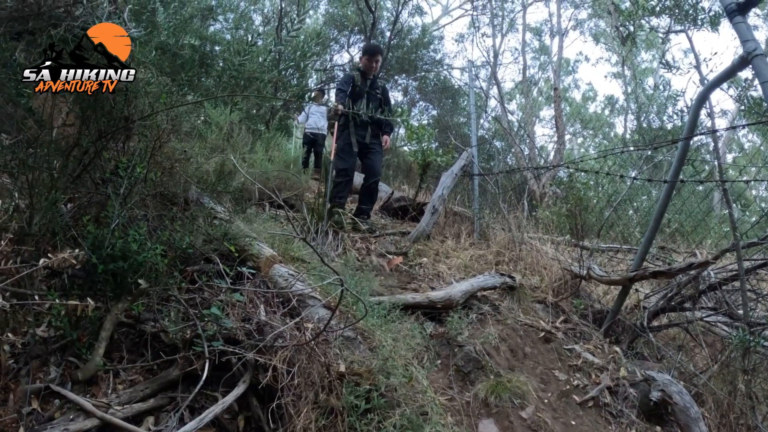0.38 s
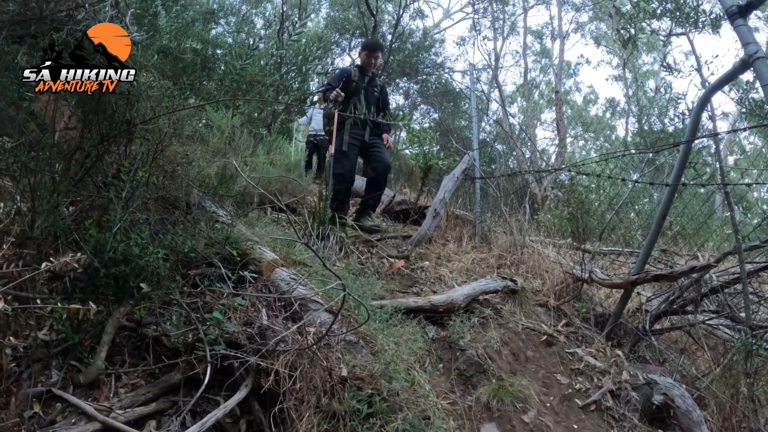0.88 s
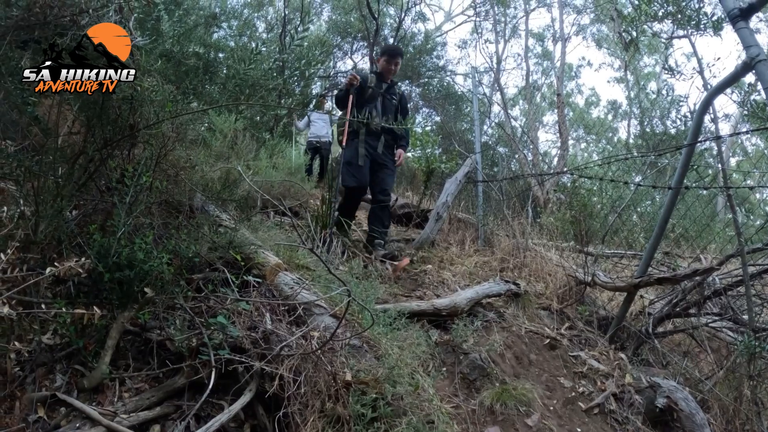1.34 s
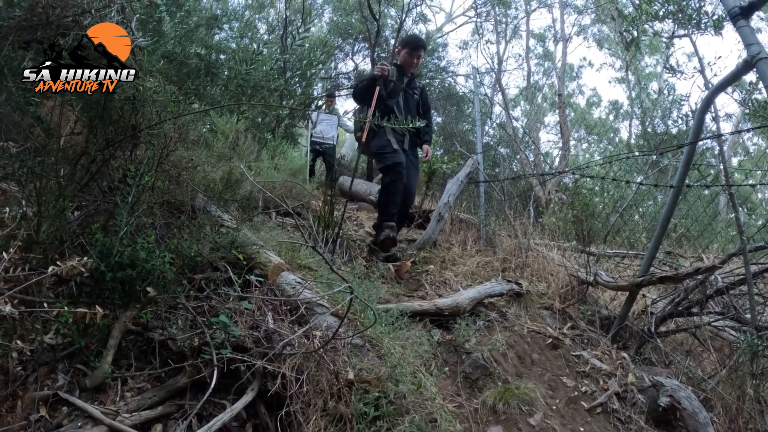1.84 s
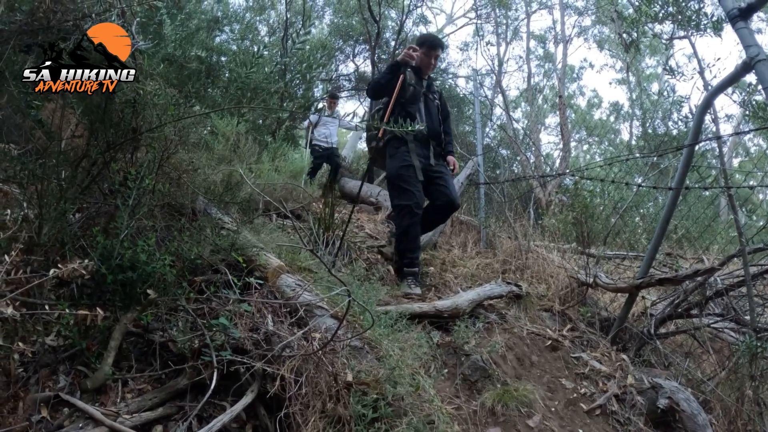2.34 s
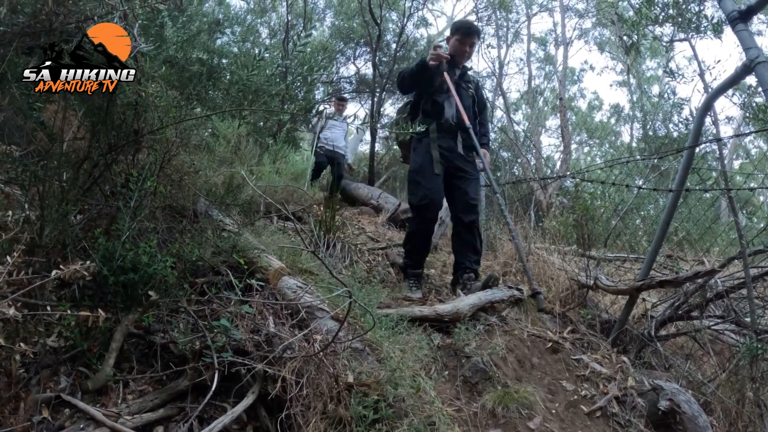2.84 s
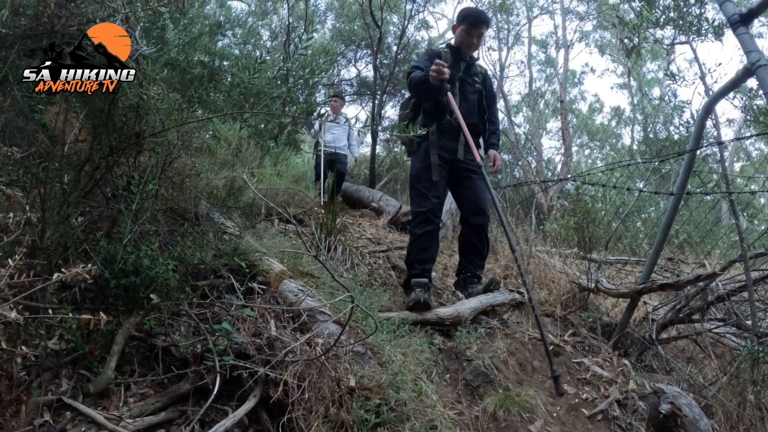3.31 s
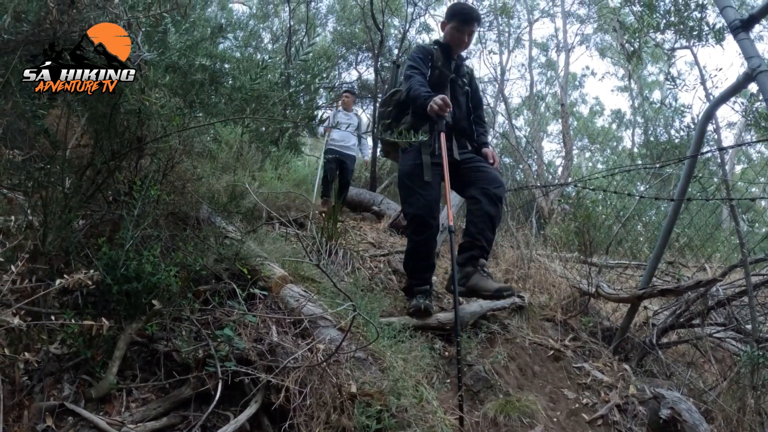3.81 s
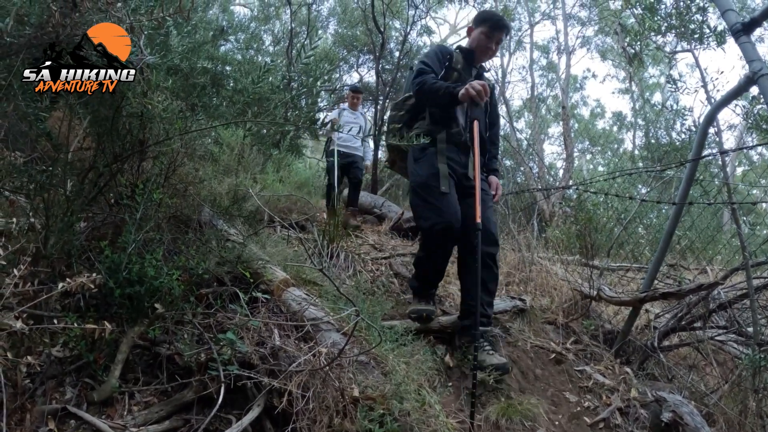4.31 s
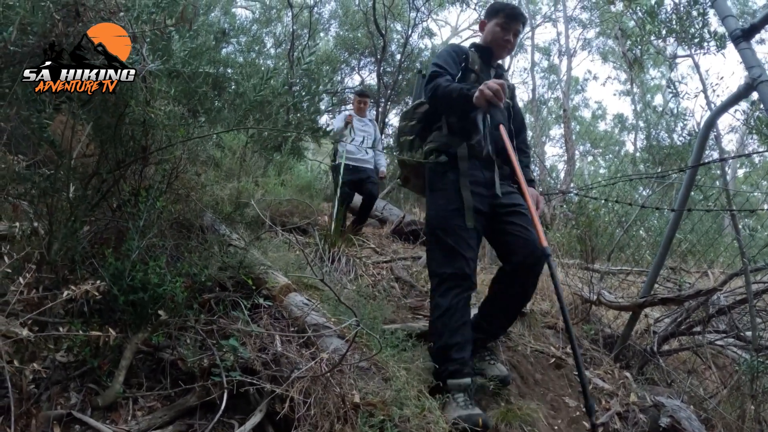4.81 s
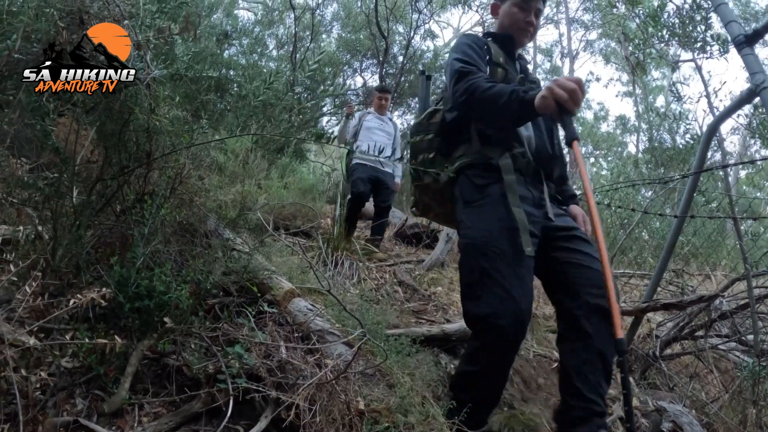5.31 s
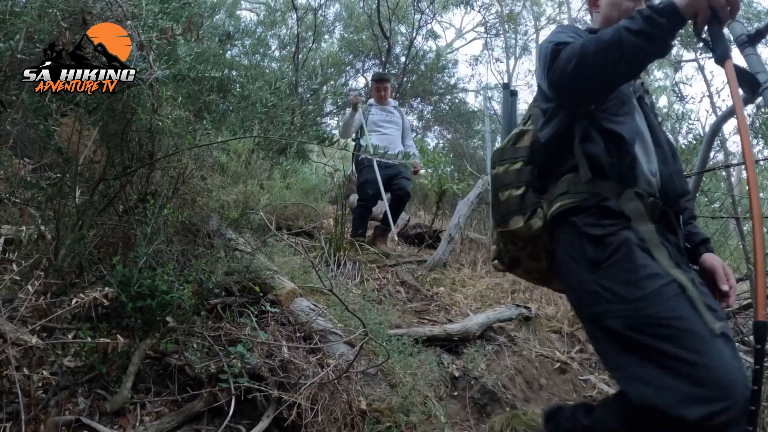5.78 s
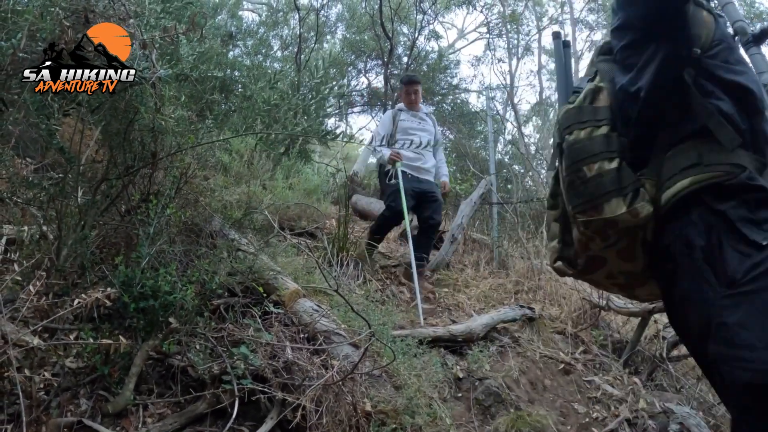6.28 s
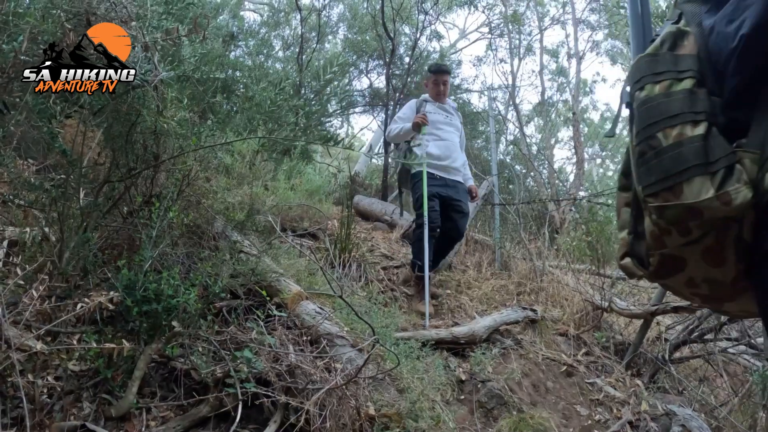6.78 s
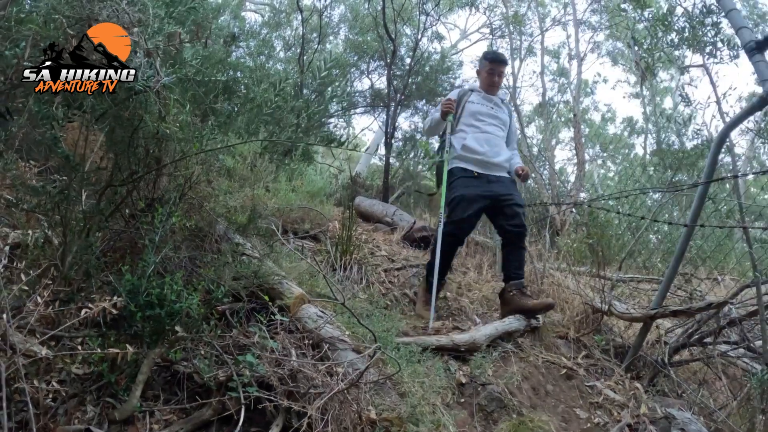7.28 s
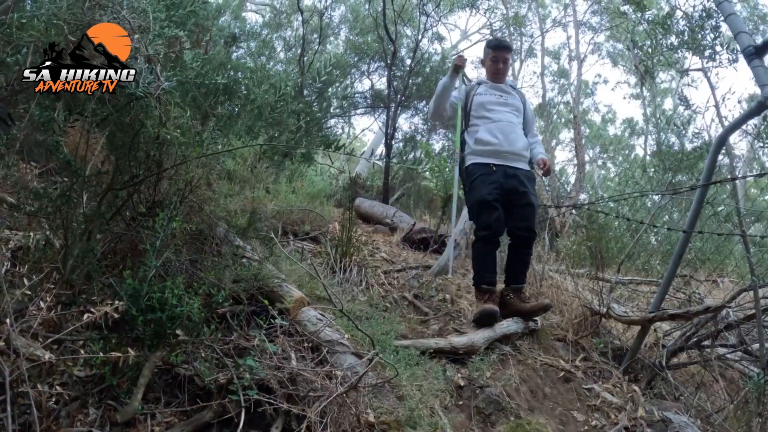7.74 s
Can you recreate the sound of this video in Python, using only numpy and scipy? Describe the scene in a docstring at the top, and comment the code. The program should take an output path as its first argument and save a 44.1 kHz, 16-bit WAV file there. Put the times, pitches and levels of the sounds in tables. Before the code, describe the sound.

Two hikers descend through brittle litter: soft leaf crackle, sharp pole knocks, then close heavy twig breaks, thuds and crumbling soil.

```python
"""Boots of two walkers coming down a dry bush slope: leaf crackle is noise plus ringing grains, soil slides.
Twigs snap as short damped cycles with splinter noise; heels thud as low swings of sagging pitch.
A metal trekking pole rings as a sum of decaying modes when it knocks logs and stones.
The slope scatters the sharp sounds; behind lie bird peeps in sines, and breeze rumble and air in shaped noise.
Two close microphone ports hear it all, each with a slightly different colour and timing."""
import sys
import numpy as np
from scipy import signal
from scipy.fft import rfft, irfft, next_fast_len
from scipy.io import wavfile
from scipy.ndimage import uniform_filter1d

SR = 44100
rng = np.random.default_rng(int(sys.argv[2]) if len(sys.argv) > 2 else 0)


def to_linear_factor(level_db):
    """Convert decibel levels (scalar or array-like) to linear amplitude factors."""
    exponent = np.asarray(level_db, float) / 20
    return 10 ** exponent


def int16_out(signal):
    """Quantize to a 16-bit WAV file."""
    q = np.round(np.clip(np.atleast_2d(signal).T, -1, 1) * 32767)
    wavfile.write(sys.argv[1], SR, q.astype(np.int16))


N = 347508  # length in samples

# boots pressing into the litter: t/s of full weight, leaf level/dB, soil level/dB,
# time/s to build the last 10 dB, time/s to settle by 10 dB (times below 0.005 s act as 0.005 s)
FOOTFALLS = [(.04, -54.5, -64, .03, 0.05), (.175, -60.5, -68, -0.5, -0.1), (.27, -51, -58.5, .02, 0.13),
             (.47, -46, -50.5, 0.05, 0.0835), (.65, -54, -72, .15, 0.3), (1.04, -54, -62, 0.03, 0.2),
             (1.16, -58.5, -65.5, 0, .15), (1.335, -47, -48, .02, 0.12), (1.498, -49.5, -58.5, 0.08, .09),
             (1.851, -53, -61, -0.06, 0.06), (1.995, -46, -70, .02, 0.27), (2.225, -51, -52.5, 0.04, 0.14),
             (2.39, -50, -55, -0.1, -0.13), (2.545, -46, -80, 0.13, 0.16), (2.783, -43.5, -51, 0.03, 0.09),
             (2.96, -56, -64, 0.07, 0.36), (3.188, -49.5, -54, 0.04, 0.22), (3.31, -54.5, -63, 0.03, 0.19),
             (3.515, -37.5, -66, .01, .065), (3.708, -52.5, -60.5, -0.16, 0.13),
             (4.247, -52, -54, 0.07, 0.04), (4.44, -57.5, -61.5, 0.4, 0.6), (4.54, -51, -54.5, .05, 0.2),
             (4.875, -40.5, -39, 0.0336, 0.17), (5.058, -42, -51.5, 0.0056, 0.07),
             (5.22, -50.5, -52, 0.05, 0.5), (5.501, -48, -45.5, 0.04, 0.07),
             (5.678, -38, -37, 0.0634, 0.03), (5.769, -48, -47.5, 0.11, 0.05),
             (5.98, -45.5, -48.5, .06, 0.08), (6.231, -37, -39.5, 0.0623, 0.11),
             (6.37, -45, -44, 0.04, 0.1), (6.61, -34, -31, 0.0229, 0.07), (6.68, -40.5, -41, .04, 0.05),
             (6.75, -44, -42, 0.17, .025), (6.91, -42, -45, 0.07, 0.04), (6.988, -40, -37, 0.05, 0.05),
             (7.064, -41, -34.5, -0.04, 0.03), (7.132, -42.5, -34.5, -0.01, 0.1),
             (7.24, -45, -42, 0.07, 0.11), (7.321, -39.5, -36.5, 0.04, 0.0453),
             (7.36, -43, -42, 0.09, 0.08), (7.65, -46, -47, 0.22, 0.43)]


def tread(column, rest_db):
    """Power addition: every step swells and settles exponentially above a resting level."""
    t = np.arange(0, N + 128, 64) / SR
    power = to_linear_factor(rest_db) ** 2
    for row in FOOTFALLS:
        s, build, settle = row[0], max(row[3], .005), max(row[4], .005)
        tens_below = np.where(t < s, (s - t) / build, (t - s) / settle)
        power = power + to_linear_factor(row[column] - 10 * tens_below) ** 2
    return np.interp(np.arange(N) / SR, t, np.sqrt(power))


# colour of crushed dry leaves: f/Hz, relative level/dB per Hz
LEAF_SPECTRUM = [(410, -9.5), (700, -20.5), (852, -19.5), (1520, -0.5), (1970, -1), (2590, -0.5),
                 (5470, -2.5), (8530, -7), (9990, -8.5), (14000, -28), (16000, -50)]


def leaves():
    """Superposed fractures: many merge into a dense rustle, the separate ones crackle on top."""
    rest_db = -66  # litter shifting between steps
    rustle = to_linear_factor(-3.0) * hiss(LEAF_SPECTRUM, 2.0, 1.13, size=256)
    crackle = to_linear_factor(-3.5) * grains(LEAF_SPECTRUM, 708, 13920, 1500, 3.16, 4.9)
    return tread(1, rest_db) * (rustle + crackle)


# colour of loose earth: f/Hz, relative level/dB per Hz
SOIL_SPECTRUM = [(40, -3), (70, -2.5), (200, -1.5), (400, -7), (800, -10.5), (1300, -5.5), (2000, -17.5),
                 (4000, -58)]


def soil():
    """Granular friction: earth slides as noise under the soles while clods crumble as low grains."""
    rest_db = -74.5  # earth shifting between steps
    slide = to_linear_factor(-3.5) * hiss(SOIL_SPECTRUM, 3.35, 3.6)
    clods = to_linear_factor(-6.5) * grains(SOIL_SPECTRUM, 82.5, 1143, 500, 2.5, 2.5, count=12)
    return tread(2, rest_db) * (slide + clods)


# twigs and brittle leaves breaking, and at 3.511 s the sharp crack of the pole knock: t/s, peak level/dB of the
# wood, wood f/Hz, 60 dB decay time/s of the noise (held within 0.003-0.09 s), spray level/dB relative to the
# wood
TWIG_BREAKS = [(0.428, -35, 2830, 0.016, -7), (0.559, -39.5, 1560, 0.025, -17),
               (0.608, -39.5, 1870, 0.023, -20), (0.675, -37, 3730, 0.023, -5),
               (0.97, -35, 3320, 0.013, -27), (1.329, -30.5, 4540, 0.099, -15),
               (1.382, -29, 4000, 0.0082, 5.5), (1.415, -41, 3280, 0.016, -16),
               (1.861, -28.5, 4850, 0.0065, -1), (2.163, -38, 3310, 0.018, -13),
               (2.213, -39.5, 1990, 0.043, 6.5), (2.721, -31.5, 2900, 0.1, -18),
               (2.792, -26, 2540, 0.047, -24), (2.865, -32, 3360, 0.022, -19),
               (3.237, -32, 4100, 0.012, -25), (3.424, -25.5, 2500, 0.0161, -2.5),
               (3.511, -19, 1680, 0.065, 3.5), (4.234, -27.5, 2180, 0.015, -19),
               (4.253, -27.5, 4100, 0.011, -25), (4.398, -34.5, 3550, 0.024, -21),
               (4.829, -29, 2340, 0.02, 0), (4.865, -19, 4600, 0.0097, -0.5),
               (4.993, -15, 2430, 0.014, -21), (5.29, -35, 2070, 0.009, -2.5),
               (5.677, -35, 1160, 0.038, 12), (5.757, -32, 3080, 0.019, -28),
               (5.823, -25, 2530, 0.006, -30), (6.068, -22.5, 3380, 0.013, -21.5),
               (6.091, -34.5, 5000, 0.012, -4), (6.153, -28.5, 4500, 0.012, -10),
               (6.293, -26.5, 1460, 0.014, 0), (6.352, -13, 1260, 0.025, -1),
               (6.485, -25.5, 1240, 0.015, -34), (6.53, -22.5, 4580, 0.0084, -9),
               (6.543, -22, 1110, 0.023, -13), (6.606, -9.5, 4300, 0.002, -26),
               (6.617, -30, 5400, 0.0095, -29), (6.626, -15, 3370, 0.0073, -20),
               (6.661, -19, 2340, 0.018, 1), (6.676, -24, 4800, 0.0096, 2), (6.708, -20, 3570, 0.0031, 4),
               (6.734, -12.5, 2970, 0.013, -21), (6.758, -21, 1620, 0.0075, 0),
               (6.91, -32, 5540, 0.03, 3.5), (7.05, -21.5, 2400, 0.019, -27), (7.06, -19, 2570, 0.015, -29),
               (7.116, -30, 1100, 0.0094, -22), (7.137, -27, 3000, 0.012, -10),
               (7.164, -30, 5000, 0.011, -0.5), (7.231, -19.5, 3550, 0.0042, -29),
               (7.253, -24, 3100, 0.02, -18.5), (7.347, -24.5, 2970, 0.012, -5),
               (7.366, -30, 3310, 0.01, -17), (7.39, -31, 4500, 0.007, -5),
               (7.434, -30.5, 4670, 0.018, -0.5), (7.84, -28.5, 2520, 0.004, -29)]


def snaps():
    """Sudden strain release: a few cycles of wood, their ground bounce, splintering and a bright spray."""
    out, t = np.zeros(N), np.arange(4000) / SR
    noises = rng.standard_normal((len(TWIG_BREAKS), 2, 4000))
    for (s, db, hz, t60, spray_db), noise in zip(TWIG_BREAKS, noises):
        fall = to_linear_factor(-60 * t / np.clip(t60, .003, .09)) * (1 - np.exp(-t / .0004))
        click = peaked(np.sin(2 * np.pi * hz * t) * t * np.exp(-t * hz * 2.06))
        click += 0.35 * np.roll(click, round(0.002013 * SR))  # bounce off the ground
        splinters = .7 * peaked(band(noise[0] * fall, hz / 2.2, hz * 2.2))
        wood = peaked(band(click + splinters, 150, 8500))
        spray = peaked(band(noise[1] * fall, 2220, 9030, order=4))
        add(out, s - .0006, to_linear_factor(db) * (wood + to_linear_factor(spray_db) * spray))
    return out


# heels and lumps of earth landing: t/s, peak level/dB, settled f/Hz,
# 60 dB decay time/s (at least 0.01 s)
HEEL_THUDS = [(0.46, -42, 302, 0.17), (1.326, -38.5, 52, 0.06), (1.619, -43, 56.5, 0.037),
              (2.26, -41, 493, 0.06), (2.37, -43, 167, 0.19), (2.754, -40.5, 62.6, 0.11),
              (3.149, -44.5, 95, 0.089), (3.29, -50, 122, 0.08), (3.693, -42.5, 74.5, 0.078),
              (4.51, -35, 61, 0.087), (4.856, -39, 161, 0.085), (4.883, -32, 192, 0.04),
              (4.939, -29, 144, 0.038), (4.991, -15.5, 762, 0.071), (5.046, -29.5, 284, 0.046),
              (5.211, -40.5, 174, 0.064), (5.681, -19.5, 348, 0.029), (6.261, -31.5, 140, 0.13),
              (6.29, -29, 51, 0.024), (6.602, -15, 908, 0.077), (6.658, -23.5, 314, 0.024),
              (6.981, -26, 318, 0.063), (7.05, -9, 199, 0.023), (7.115, -22, 833, 0.056),
              (7.247, -30.5, 162, 0.04), (7.303, -28, 700, 0.075), (7.542, -32.5, 59.6, 0.057),
              (7.7, -37.5, 154, 0.096)]


def thuds():
    """Damped oscillation: the struck ground swings at a sagging pitch, with a puff of earth."""
    out, t = np.zeros(N), np.arange(9000) / SR
    for (s, db, hz, t60), noise in zip(HEEL_THUDS, rng.standard_normal((len(HEEL_THUDS), 9000))):
        swing = np.sin(2 * np.pi * hz * (t + 0.0016 * (1 - np.exp(-t / 0.0033))))
        puff = evened(band(noise, hz / 2, hz * 2.5))
        rise = 1 - np.exp(-t * hz / 0.62)  # builds over about a cycle
        thud = (swing + 0.76 * puff) * rise * to_linear_factor(-60 * t / max(t60, .01))
        add(out, s, to_linear_factor(db) * peaked(thud))
    return out


def ring(modes, t, grip, phases):
    """Modal superposition: decaying sines, phases in cycles, decay times scaled by the grip."""
    out = np.zeros(len(t))
    for (hz, db, t60), phase in zip(modes, phases):
        out += to_linear_factor(db - 60 * t / (t60 * grip)) * np.sin(2 * np.pi * (hz * t + phase))
    return out


# pole knocks: t/s, shaft peak level/dB, ring-time factor set by the grip (at least 0.1),
# tip ring level/dB relative to the shaft, rattle time constant/s (at least 0.0001 s), contact f/Hz
POLE_KNOCKS = [(.262, -33.5, 0.87, -29, 0.0031, 1750), (.459, -14.5, 0.32, -42, 0.0053, 2070),
               (1.146, -47, 1, -7, 0.0022, 1900), (2.056, -19, 1.08, -17, 0.0029, 1780),
               (2.606, -13.5, 0.61, -29, 0.000067, 3050), (3.471, -17, 0.75, -19, 0.00056, 1760),
               (3.507, -9.5, 0.36, -33, 0.016, 1930), (3.687, -13, 0.78, -34, 0.0044, 2040),
               (3.95, -28, 0.29, -49, 0.0069, 1870), (4.687, -9.5, 0.36, -26.5, 0.00015, 2780)]
# modes of the hollow shaft: f/Hz, level/dB before contact weighting, 60 dB decay time/s before the grip
SHAFT_MODES = [(880, -8, .05), (1165, -7, .06), (1495, -1, .055), (1855, -1, .04), (2280, -3, .025),
               (2830, -1, .028), (3350, -1, .025), (3870, -2, .02), (4550, -4, .02), (5500, -5, .015)]
# modes of the hard tip: f/Hz, relative level/dB, 60 dB decay time/s
TIP_MODES = [(7140, -8, .2), (7182, -5, .16), (7210, -3, .19), (7273, -1.5, .17), (7345, -6, .15),
             (7420, -12, .1)]


def pole():
    """Modal excitation: rattling blows drive the shaft's brief ring; the hard tip sings as well."""
    out, t = np.zeros(N), np.arange(14000) / SR
    draws = rng.standard_normal((len(POLE_KNOCKS), 3020))
    for (s, db, grip, tip_db, rattle, contact_hz), draw in zip(POLE_KNOCKS, draws):
        blows = 0.37 * draw[20:] * np.exp(-t[:3000] / max(rattle, .0001))
        blows[:9] += signal.windows.hann(9)  # first contact
        # a contact drives mostly the modes near the pitch that its hardness sets
        modes = [(hz, mode_db - 11 * np.log2(hz / contact_hz) ** 2, t60)
                 for hz, mode_db, t60 in SHAFT_MODES]
        shaft = signal.fftconvolve(ring(modes, t, max(grip, .1), 0 * draw), blows)[:len(t)]
        shaft = peaked(band(shaft, 0.69 * contact_hz, 9600, order=3))
        tip = peaked(ring(TIP_MODES, t, 1, draw) * (1 - np.exp(-t / .005)))
        add(out, s, to_linear_factor(db) * (shaft + to_linear_factor(tip_db) * tip))
    return out


def bush(x):
    """Diffuse scattering: trunks, scrub and slope give a short tail, different at each port."""
    t = np.arange(12000) / SR
    echoes = rng.standard_normal((3, len(t))) * (rng.random((3, len(t))) < .1)  # sparse
    shared, left, right = echoes
    tail = np.array([shared + .9 * left, shared + .9 * right])
    tail *= to_linear_factor(-60 * t / 0.055) * (t > .002)  # 60 dB decay in 0.055 s, after a 2 ms gap
    tail = band(tail, 630, 12000)
    return signal.fftconvolve(x[None], tail / np.linalg.norm(tail[0]), axes=1)[:, :N]


# faint peeps of a distant bird: t/s, peak level/dB, f/Hz, length/s
BIRD_PEEPS = [(0.182, -55.5, 3270, 0.022), (0.226, -63, 3270, 0.015), (0.904, -64, 3300, 0.022),
              (5.788, -57, 6750, 0.018), (5.83, -58, 6720, 0.022), (5.89, -59, 6720, 0.02)]


def bird():
    """Pure tones: soft sine peeps under half-sine envelopes."""
    out = np.zeros(N)
    for s, db, hz, length in BIRD_PEEPS:
        t = np.arange(0, length, 1 / SR)
        add(out, s, to_linear_factor(db) * np.sin(2 * np.pi * hz * t) * np.sin(np.pi * t / length))
    return out


# breeze on the ports: t/s, rumble level/dB
BREEZE_LEVEL = [(0.0, -53.5), (1.56, -53.5), (1.71, -37.5), (1.76, -49.5), (3.22, -57.5), (3.31, -47.5),
                (3.82, -58.5), (4.96, -46.5), (5.02, -63), (5.75, -48), (6.19, -61), (6.3, -46),
                (6.34, -60), (7.16, -46.5), (7.48, -55), (7.57, -30.5), (7.66, -56), (7.88, -53)]
# colour of the steady wind rumble: f/Hz, relative level/dB per Hz
RUMBLE_SPECTRUM = [(15, 2), (30, 3), (60, -7), (90, -20.5), (200, -24.5), (400, -62)]
# colour of gusts breaking up on the housing: f/Hz, relative level/dB per Hz
BUFFET_SPECTRUM = [(30, -5), (70, 3), (150, -1), (280, -33), (600, -100)]


def breeze():
    """Turbulent pressure: low rumble follows the breeze, and buffeting grows more steeply than it."""
    buffet_db, gust_db = -47.5, -38.5  # buffeting level when the breeze stands at gust_db
    slope = 1.6  # dB of buffeting gained per dB of breeze
    breeze_db = curve(BREEZE_LEVEL, 1)
    rumble = to_linear_factor(breeze_db) * hiss(RUMBLE_SPECTRUM, 2.33, 0.49, size=4096)
    buffet_gain = to_linear_factor(buffet_db + slope * (breeze_db - gust_db))
    return rumble + buffet_gain * hiss(BUFFET_SPECTRUM, 4, 4.4, size=1024)


# colour of the background air: f/Hz, relative level/dB per Hz
AIR_SPECTRUM = [(59, -60), (100, -19), (185, 6.5), (801, -31), (1680, -13), (3400, -2), (7290, -10),
                (10000, -8.5), (14100, -25.5), (16000, -48)]


def air():
    """Stationary noise: a faint, nearly steady background hiss at -67.5 dB rms."""
    return to_linear_factor(-67.5) * hiss(AIR_SPECTRUM, 0.5, 0.39)


# left-right likeness of diffuse noise: f/Hz, correlation (1 = identical)
PORT_LIKENESS = [(30, .93), (100, .975), (500, .97), (3000, .88), (9000, .8), (13000, .2)]


def hiss(spectrum, patchy_db, flicker_db, size=512):
    """Filtered noise: a correlated pair whose short-time spectrum has patches and wide-band flicker."""
    frames, hz = 4 * N // size + 5, np.fft.rfftfreq(size, 1 / SR)
    a, b, c, d, patches = rng.standard_normal((frames, len(hz), 5)).T
    patches = uniform_filter1d(patches, size=8, axis=0)  # smooth over frequency
    patches = evened(uniform_filter1d(patches, size=12, axis=1))  # and over time
    flicker = evened(uniform_filter1d(rng.standard_normal(frames), size=4))
    same = np.clip(read(PORT_LIKENESS, hz), -1, 1)[:, None]
    left, other = a + 1j * b, c + 1j * d
    z = np.array([left, same * left + np.sqrt(1 - same ** 2) * other])
    z *= to_linear_factor(read(spectrum, hz)[:, None] + patchy_db * patches + flicker_db * flicker)
    return evened(signal.istft(z, nperseg=size, noverlap=3 * size // 4)[1][:, :N])


def grains(spectrum, lo_hz, hi_hz, per_s, spread_db, cycles, count=24):
    """Random impulse excitation: uneven clicks ring a few cycles, each pitch from its own place."""
    port_lag_s = .000016  # spread of arrival time between the ports for crackles all around
    out, t = np.zeros((2, N)), np.arange(1500) / SR
    # the litter gives way in bursts, which raise and lower the base rate per_s
    clumps = to_linear_factor(6.0 * evened(uniform_filter1d(rng.standard_normal(N), size=500)))
    for hz in np.geomspace(lo_hz, hi_hz, count):
        hits = rng.random(N) < per_s * clumps / count / SR
        train = hits * to_linear_factor(spread_db * np.minimum(rng.exponential(1, N), 5))
        train = train * rng.choice([-1, 1], N)
        lag = port_lag_s * rng.standard_normal()
        u = np.maximum(t - .0001 + np.array([[lag / 2], [-lag / 2]]), 0)  # time since arrival
        grain = np.sin(2 * np.pi * hz * u) * u * hz * np.exp(-u * hz * 4 / cycles)
        grain *= to_linear_factor(read(spectrum, hz)) * np.sqrt(hz) / np.linalg.norm(grain[0])
        pan_db = 1.8 * rng.standard_normal()
        out += sides(pan_db)[:, None] * signal.oaconvolve(train[None], grain, axes=1)[:, :N]
    return evened(out)


def evened(x):
    """Root-mean-square normalisation: scales to rms 1."""
    return x / np.sqrt(np.mean(x ** 2) + 1e-20)


def peaked(x):
    """Peak normalisation: scales to peak 1."""
    return x / abs(x).max()


def band(x, lo_hz, hi_hz, order=2):
    """Causal Butterworth band-pass, its upper edge held to SR / 4."""
    edges = [lo_hz, min(hi_hz, SR / 4)]
    return signal.sosfilt(signal.butter(order, edges, "band", fs=SR, output="sos"), x)


def read(points, hz):
    """Linear interpolation of a spectrum table on a log-frequency axis."""
    f, value = np.transpose(points)
    return np.interp(np.log(hz + 1), np.log(f + 1), value)


def curve(rows, column):
    """Linear interpolation of one column of a time table at every sample."""
    rows = np.array(rows)
    return np.interp(np.arange(N) / SR, rows[:, 0], rows[:, column])


def sides(pan_db):
    """Intensity stereo: left and right gain for a level difference in dB."""
    return to_linear_factor(np.array([pan_db / 2, -pan_db / 2]))


def add(mix, s, sound):
    """Superposition: lays a sound into a track at time s."""
    part = mix[round(s * SR):][:len(sound)]
    part += sound[:len(part)]


def scene():
    """Linear superposition of all sources on the slope, with scattering of the sharp ones."""
    sharp = snaps() + pole() + bird()
    scattered = to_linear_factor(-19.0) * bush(sharp)
    return leaves() + soil() + sharp + thuds() + scattered + breeze() + air()


def roll_off(x):
    """The treble ends steeply here."""
    return signal.sosfilt(signal.butter(12, 16480, fs=SR, output="sos"), x)


# phase by which the left port leads the right: f/Hz, phase/rad
PORT_LEAD = [(100, 0), (500, -.1), (1200, -.28), (2760, -.6), (5340, -.35), (11600, -.1)]
# level of the left port over the right: f/Hz, level/dB
PORT_BALANCE = [(25, -3), (90, -1.3), (700, -.8), (2000, -1), (5000, -.2), (9000, 1.4), (14000, 4.5)]


def record(dry):
    """Linear filtering: two close ports differ a little in colour and timing, and roll off on top."""
    size = next_fast_len(N + 64)
    hz = np.fft.rfftfreq(size, 1 / SR)
    # half of each difference goes to the left port, its inverse to the right
    half = to_linear_factor(read(PORT_BALANCE, hz) / 2) * np.exp(.5j * read(PORT_LEAD, hz))
    top = 1 / np.sqrt(1 + (hz / 14800) ** 24)  # the capsules roll off
    ports = irfft(rfft(dry, size) * top * np.array([half, 1 / half]), size)[:, :N]
    return roll_off(ports)


dry = scene()
out = record(dry)
int16_out(out)
```